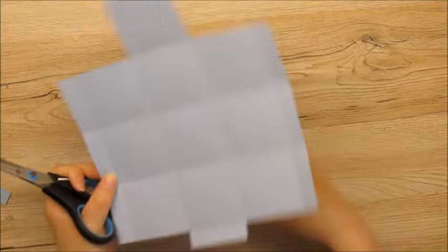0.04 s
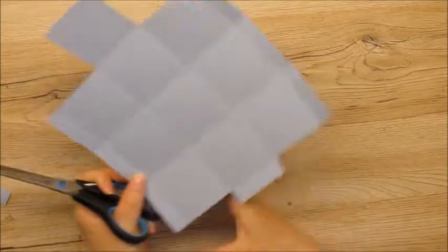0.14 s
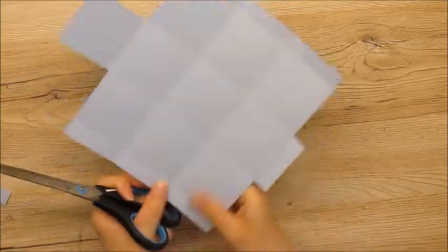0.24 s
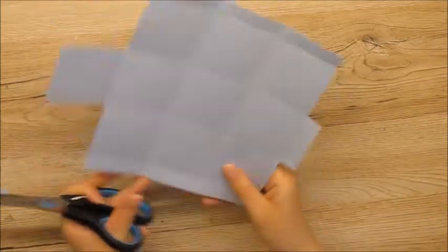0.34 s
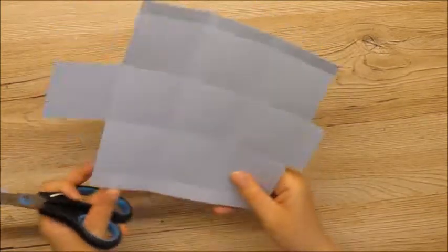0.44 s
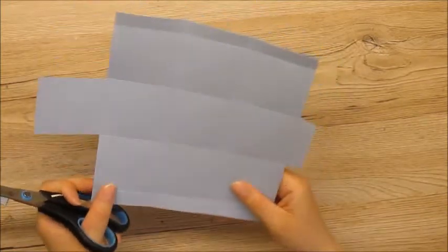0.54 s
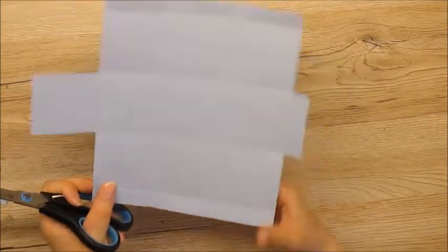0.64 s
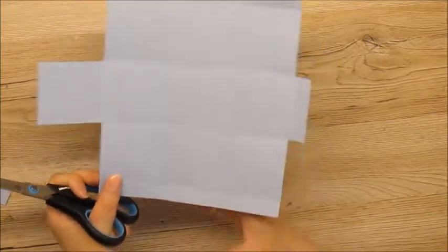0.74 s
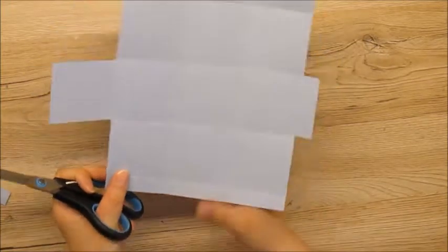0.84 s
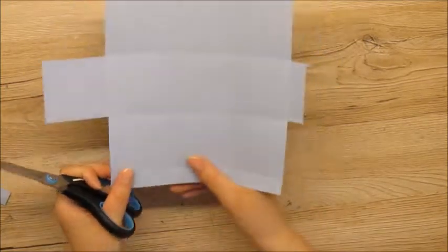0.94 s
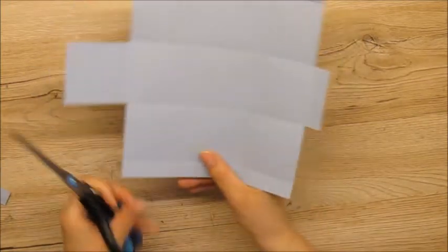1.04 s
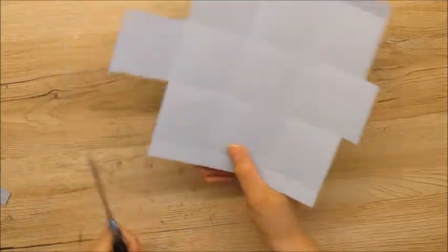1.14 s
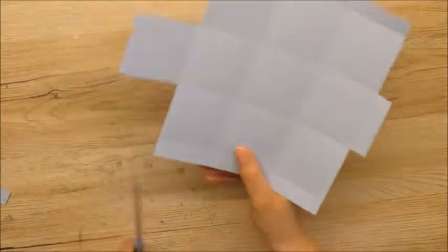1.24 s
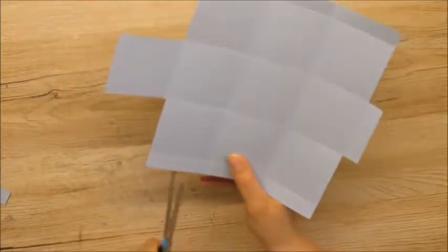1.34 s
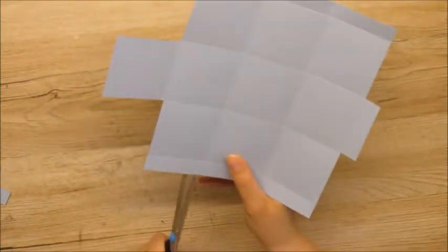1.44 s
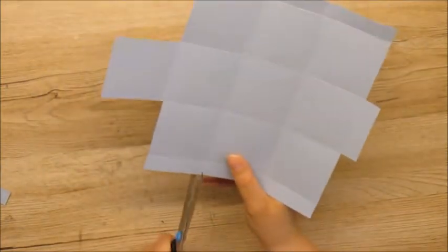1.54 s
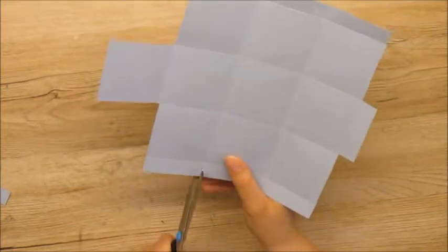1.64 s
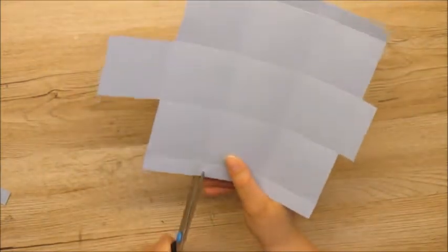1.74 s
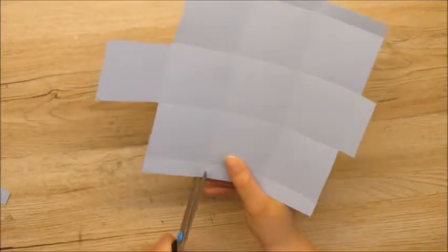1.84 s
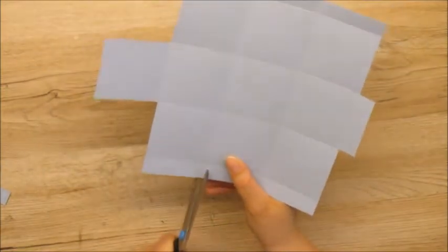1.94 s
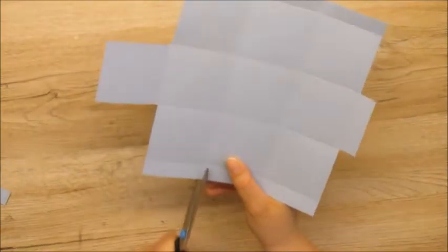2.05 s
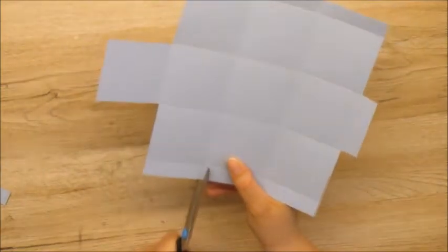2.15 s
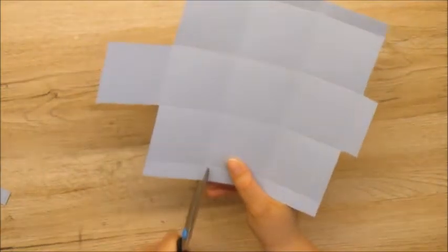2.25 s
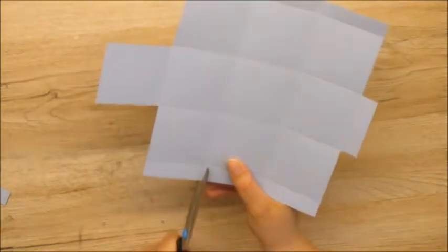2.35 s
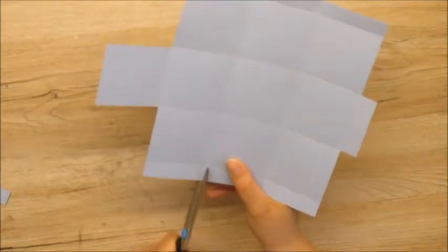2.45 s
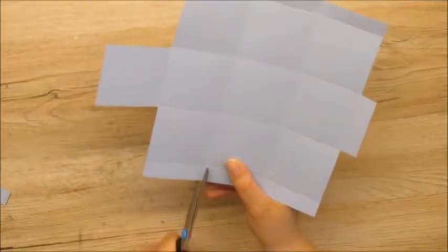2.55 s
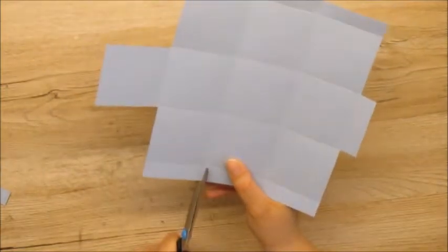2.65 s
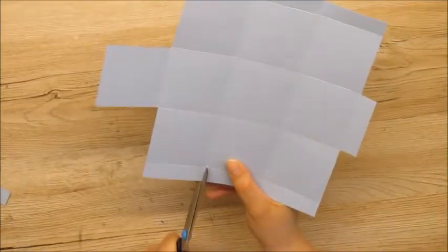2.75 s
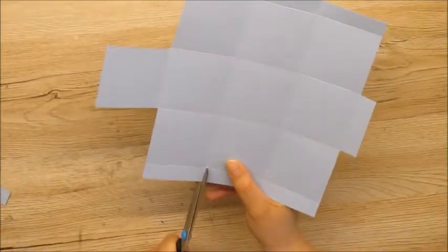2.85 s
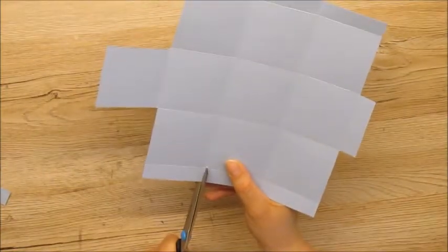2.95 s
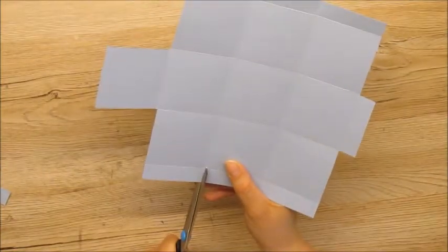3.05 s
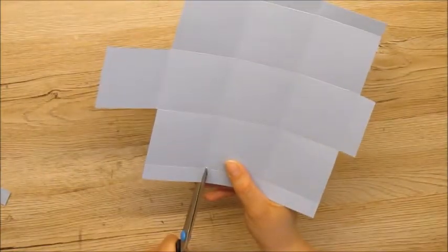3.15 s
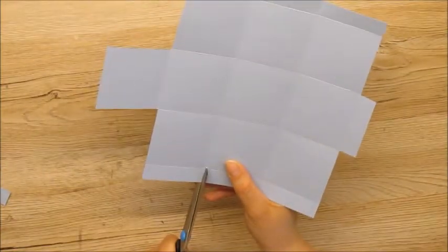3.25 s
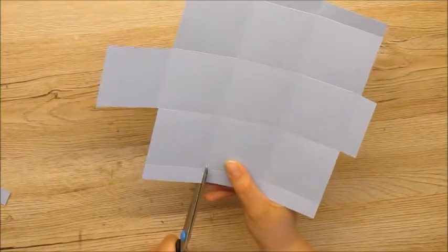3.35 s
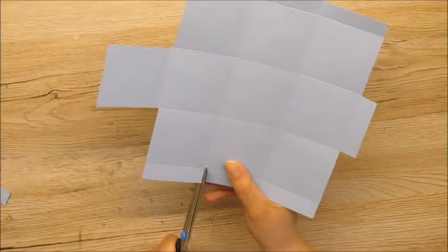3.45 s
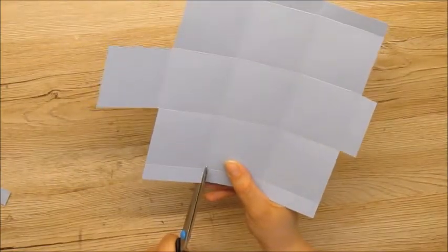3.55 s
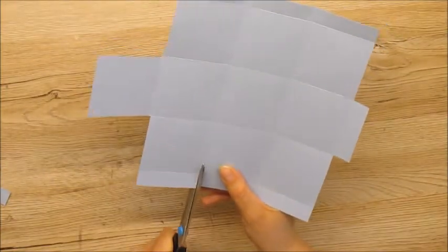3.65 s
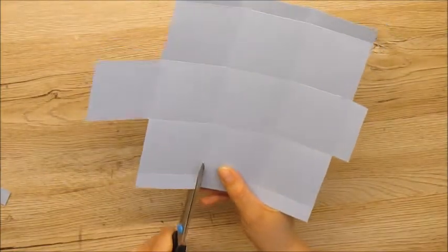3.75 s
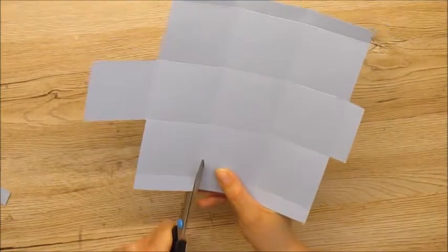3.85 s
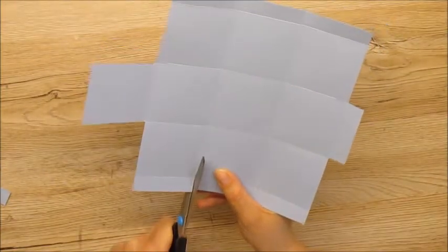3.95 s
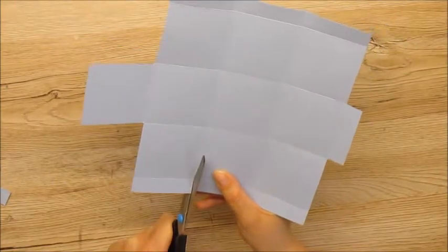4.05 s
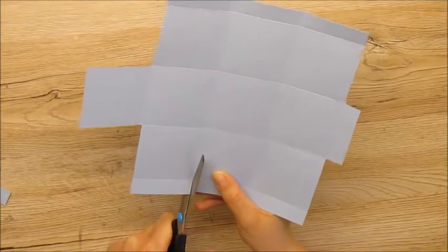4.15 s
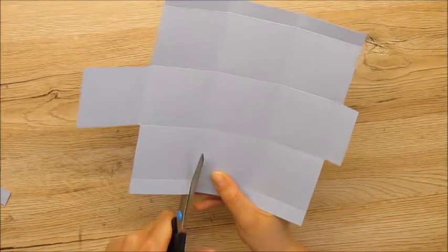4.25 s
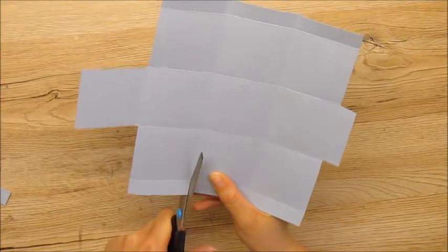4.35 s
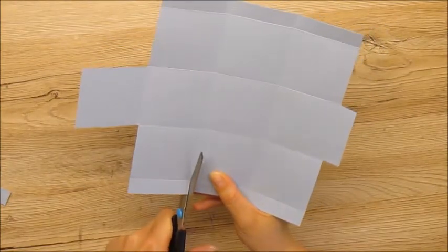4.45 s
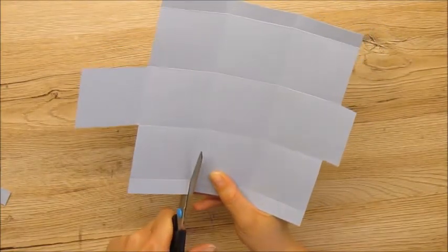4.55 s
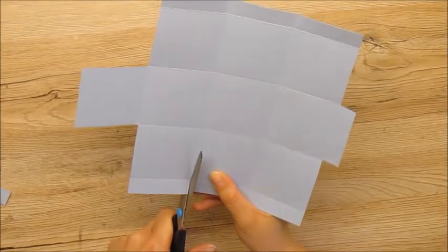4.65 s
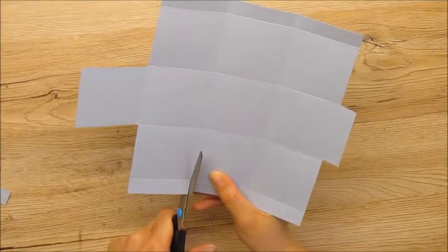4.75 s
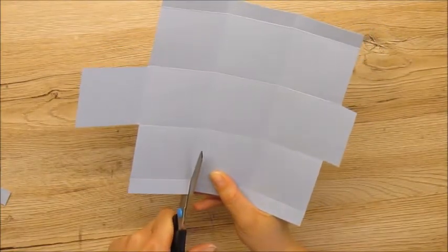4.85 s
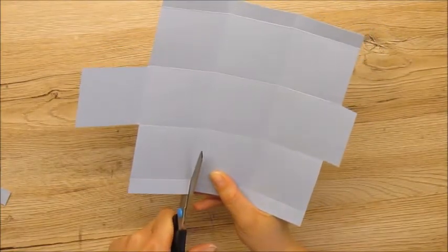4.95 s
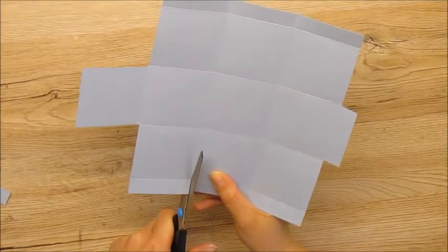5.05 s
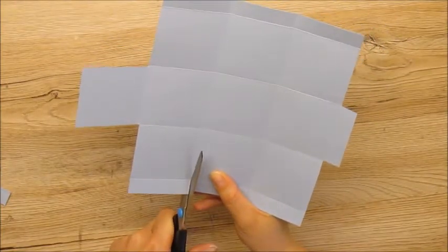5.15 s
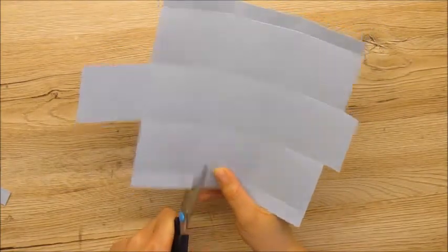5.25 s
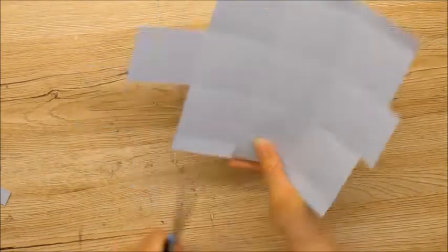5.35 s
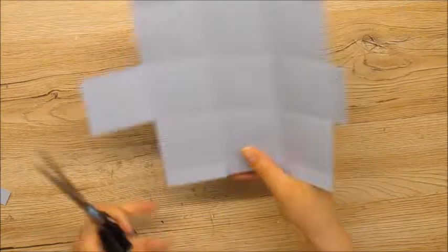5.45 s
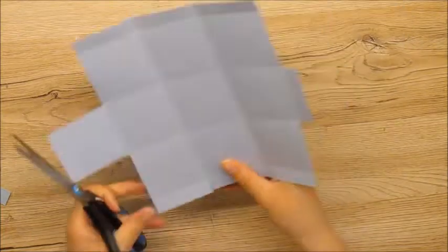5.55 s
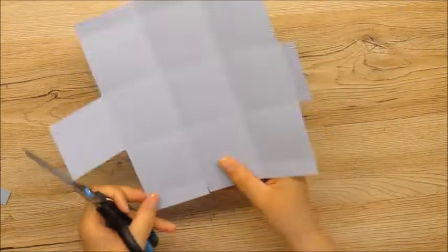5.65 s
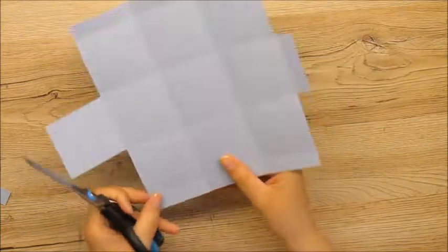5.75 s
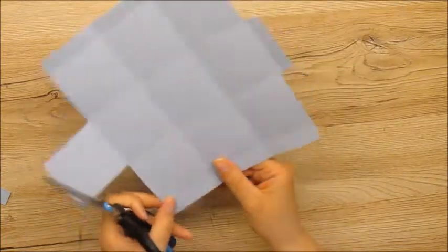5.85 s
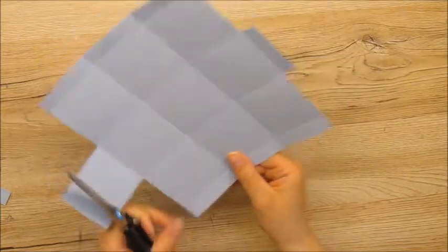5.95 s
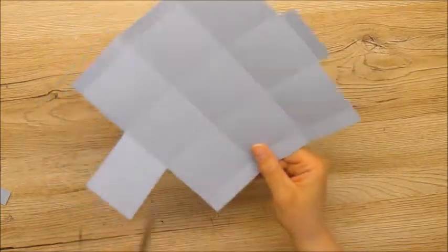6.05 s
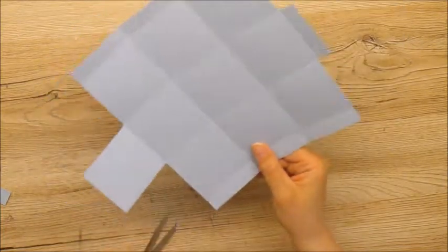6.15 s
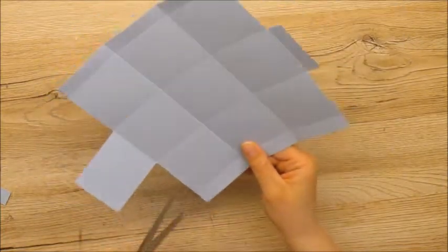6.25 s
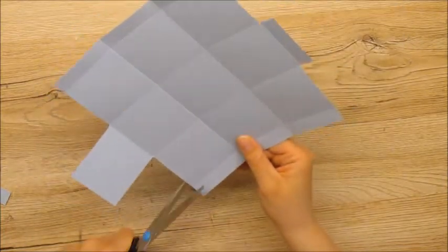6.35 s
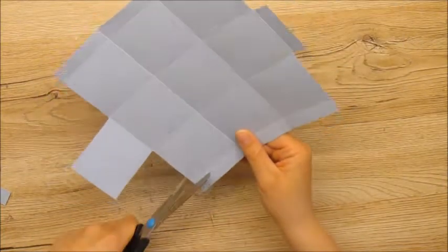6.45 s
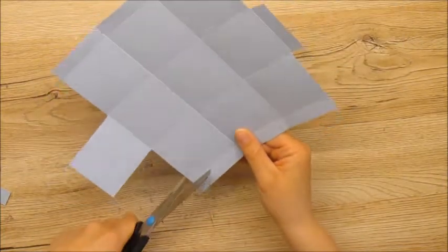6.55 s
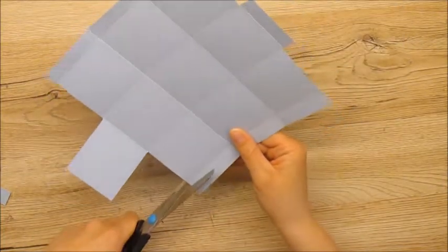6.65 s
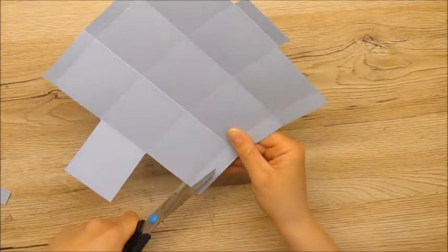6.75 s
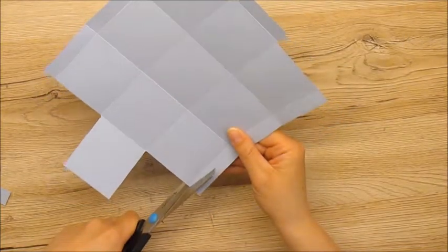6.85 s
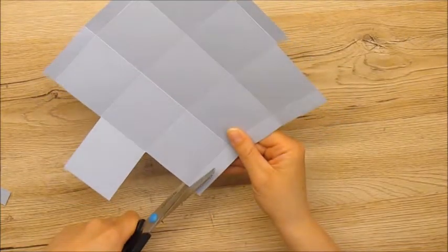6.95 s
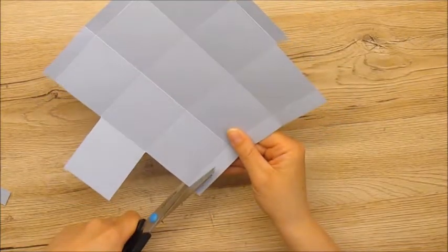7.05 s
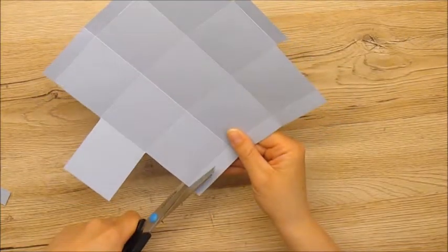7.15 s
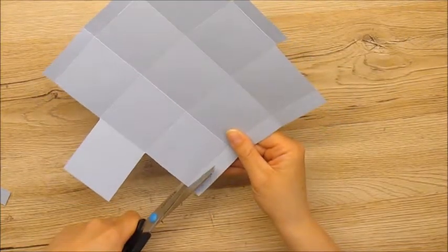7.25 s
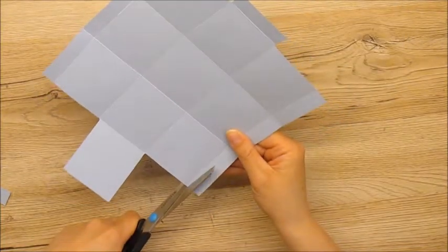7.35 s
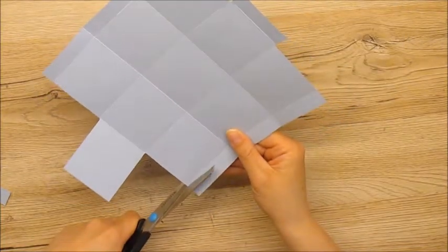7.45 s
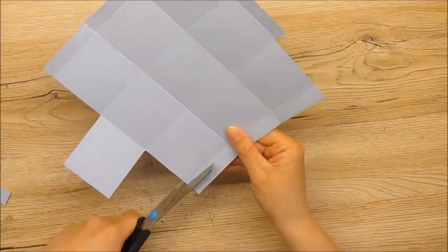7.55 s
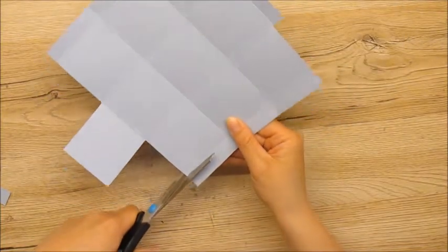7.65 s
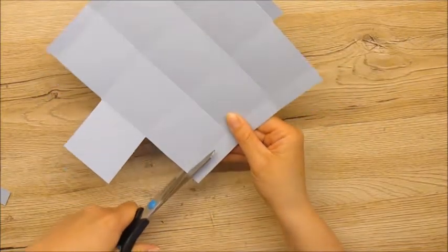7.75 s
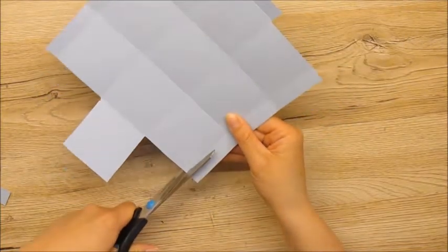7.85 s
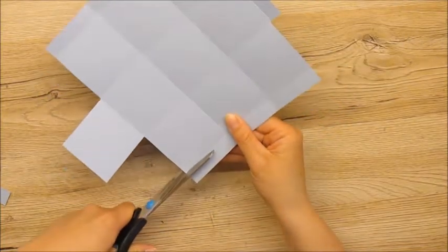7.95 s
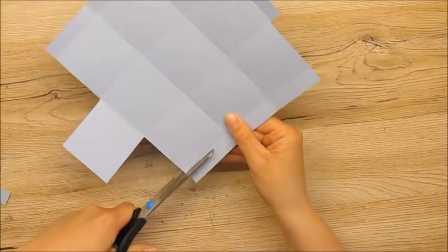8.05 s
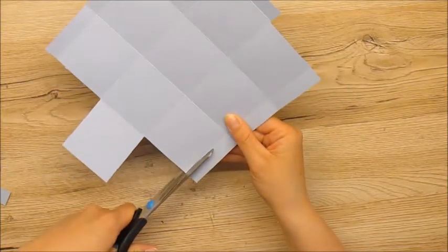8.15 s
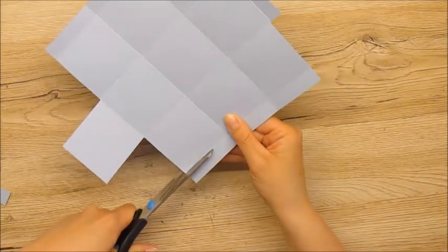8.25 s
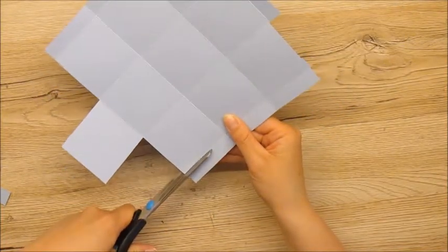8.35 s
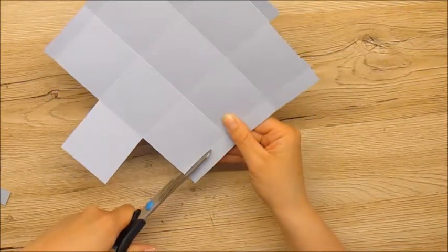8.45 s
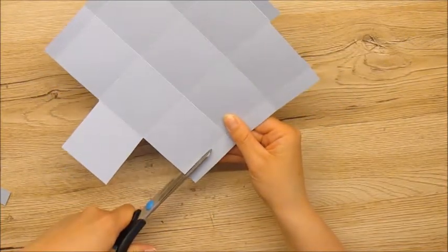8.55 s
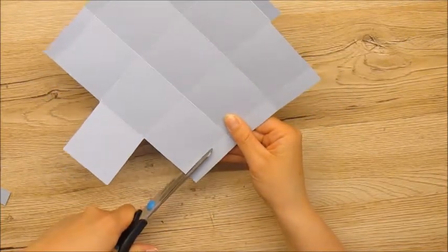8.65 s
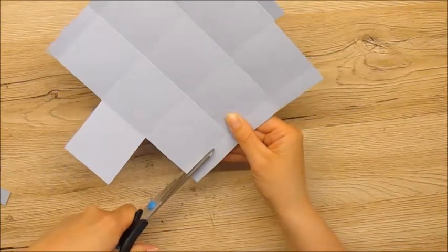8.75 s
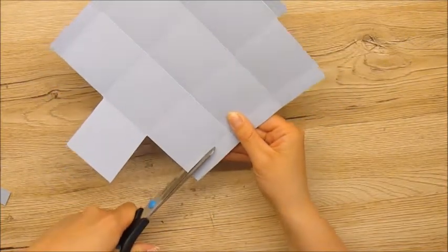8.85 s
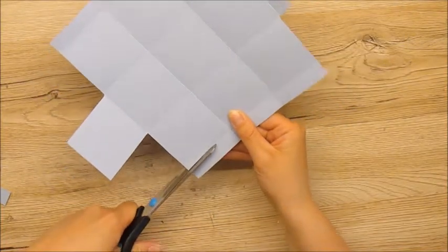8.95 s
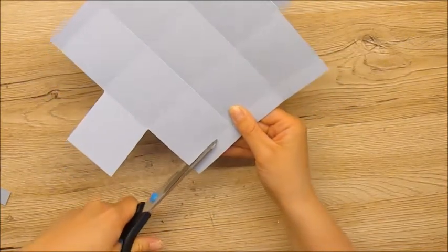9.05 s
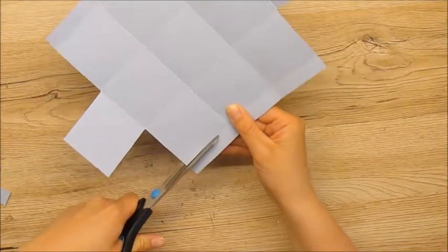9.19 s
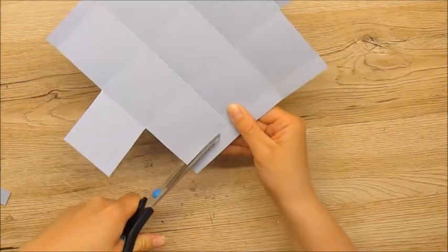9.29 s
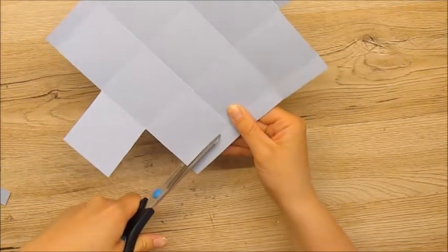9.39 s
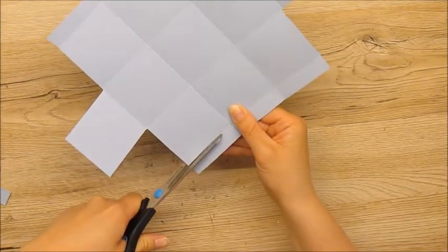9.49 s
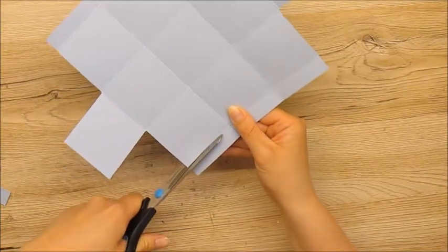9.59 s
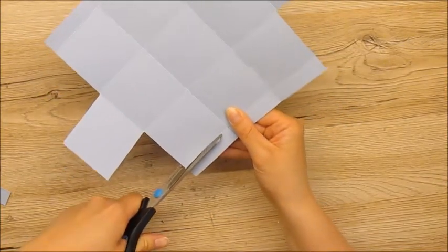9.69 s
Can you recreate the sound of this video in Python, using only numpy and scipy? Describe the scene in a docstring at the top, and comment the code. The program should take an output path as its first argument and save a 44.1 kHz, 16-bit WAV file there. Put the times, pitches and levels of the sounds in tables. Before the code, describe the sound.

Close stereo capture of card and scissors on a wooden tabletop. Busy papery slides and bumps come first, ending in a sharp scrape. A pause holds a tiny metallic squeak, then a firm knock and a single slow shearing crunch. After another pause, blades rasp loose, a loud wooden knock lands and the card shuffles. Small dry ticks, a barely audible squeak and brief rubs finish over faint low room rumble.

```python
"""A stiff card slides over a wooden table in a small room, with knocks and one harsh scrape on the table.
A faint squeak follows, scissors knock on the wood, then shear one slow cut through the card.
The blades rasp as they leave the slit, with heavy knocks; the card slides, flicks and ticks on them.
After another faint squeak come the last slides. Rubbing and contacts are noise bursts ringing in card
and steel; the wood is a set of fading tones; echoes surround the sounds over a steady room noise."""
import sys
import numpy as np
from scipy import signal
from scipy.fft import rfft, irfft, next_fast_len
from scipy.io import wavfile
from scipy.ndimage import uniform_filter1d

SR = 44100
rng = np.random.default_rng(int(sys.argv[2]) if len(sys.argv) > 2 else 0)


def digitize_waveform(pressure):
    """Quantize a signal to 16-bit integers and store it at the path in sys.argv[1].

    Rows of a 2-D input are taken as channels; values are limited to [-1, 1].
    """
    field = np.atleast_2d(pressure).T
    bounded = np.clip(field, -1, 1)
    quanta = np.round(bounded * 32767).astype(np.int16)
    wavfile.write(sys.argv[1], SR, quanta)


N = 428652

# relative colour of the flat card, driven like a drum skin: pitch_hz [Hz], level_db [dB per Hz]
SHEET_COLOUR = [(60, -10), (200, -2.5), (400, -8), (650, -9.5), (900, -0.5), (1600, -1), (3000, -3),
                (4500, -13), (8000, -37), (16000, -81.5)]
# relative colour of the hiss at the card's edge: pitch_hz [Hz], level_db [dB per Hz]
EDGE_COLOUR = [(500, -50.5), (2000, -16), (3500, 0), (5000, 1), (7000, 1.5), (10000, 2), (12500, -3.5),
               (15500, -13)]


def amp(db):
    """Turn decibels into a gain."""
    return 10 ** (np.asarray(db) / 20)


def unit(x):
    """Scale x to an rms (average strength) of 1."""
    return x / np.sqrt(np.mean(x ** 2) + 1e-20)


def along(points, hz):
    """Read a curve of (Hz, value) points on a logarithmic pitch axis."""
    point_hz, value = np.transpose(points)
    return np.interp(np.log(hz + 1), np.log(point_hz + 1), value)


def filtered(x, response):
    """Multiply each pitch in x by a response that depends on frequency."""
    size = x.shape[-1]
    padded = next_fast_len(size + SR // 4)
    hz = np.fft.rfftfreq(padded, 1 / SR)
    return irfft(rfft(x, padded) * response(hz), padded)[..., :size]


def convolved(x, ring):
    """Let every sample of x ring on in the shape of an impulse response."""
    return signal.fftconvolve(x, ring, axes=-1)


def add(track, start_s, sound):
    """Mix a sound into the stereo track from its start time."""
    part = track[:, max(round(start_s * SR), 0):][:, :sound.shape[1]]
    part += sound[:, :part.shape[1]]


def wobble(rate, size):
    """Draw a random curve through `rate` random points a second."""
    points = rng.standard_normal(SR // 10)
    return np.interp(np.arange(size) * rate / SR, np.arange(SR // 10), points)


def strokes(rows):
    """Give the start time of a stroke, then each of its columns sample by sample."""
    time_s, *columns = np.transpose(rows)
    t = np.arange(time_s[0], time_s[-1], 1 / SR)
    return time_s[0], *(np.interp(t, time_s, column) for column in columns)


def body(colour, peaks=(), size=4096):
    """Ring of a solid object: a broad colour plus resonances, with a total energy of 1."""
    hz = np.fft.rfftfreq(size, 1 / SR)
    db = along(colour, hz)
    for centre_hz, width_hz, gain_db in peaks:
        db = db + gain_db / (1 + (2 * (hz - centre_hz) / width_hz) ** 2)
    # keeping one half of the cepstrum makes the ring start at once and only follow the blow
    cepstrum = irfft(np.log(amp(db)))
    ring = irfft(np.exp(rfft(2 * cepstrum[:size // 2], size)))
    return ring / np.linalg.norm(ring)


def room_tone(level_db=-58.5):
    """Low rumble of the room under a hiss; the two ears hear partly the same noise at each pitch."""
    # relative colour of the noise: pitch_hz [Hz], level_db [dB per Hz]
    floor_colour = [(12, -28.5), (20, -5.5), (65, 3.5), (167, -3.5), (215, -1.5), (247, -6), (408, -10),
                    (510, -14.5), (819, -18), (1050, -17.5), (1740, -22.5), (2120, -24), (2300, -25.5),
                    (9560, -28), (15800, -32.5)]
    # how alike left and right are: pitch_hz [Hz], likeness [-1 opposite to 1 identical]
    floor_alike = [(60, -0.579), (150, -0.4654), (380, -0.35), (950, -0.085), (2380, 0.205), (5980, -0.088),
                   (15000, 0.122)]

    def response(hz):
        turn = np.arccos(np.clip(along(floor_alike, hz), -1, 1)) / 2
        return amp(along(floor_colour, hz)) * [np.cos(turn), np.sin(turn)]

    mid, side = filtered(rng.standard_normal((2, N)), response)
    return amp(level_db) * np.array([mid + side, mid - side]) / np.std(mid)


def reflections(early_db, late_db, early_t60=0.0552):
    """Dense echoes from the table and things near it, then the room's tail; t60 is a 60 dB fade in s."""
    # how long the room rings: pitch_hz [Hz], t60_s [s]
    room_fade = [(200, 0.3), (2000, 0.2317), (12000, 0.211)]
    hz, t, z = signal.stft(rng.standard_normal(SR // 2), SR, nperseg=256)
    fade = amp(-60 * t / along(room_fade, hz)[:, None])
    late = signal.istft(z * fade, SR, nperseg=256)[1]
    t = np.arange(len(late)) / SR
    early = rng.standard_normal(len(late)) * amp(-60 * t / early_t60)
    return amp(early_db) * early / np.linalg.norm(early) + amp(late_db) * late / np.linalg.norm(late)


def in_room(x, early_db, late_db, side_db):
    """Put the direct sound in the middle, with reflections spreading wider towards the treble."""
    # width of the reflections, before side_db is added: pitch_hz [Hz], side_level_db [dB]
    side_width = [(100, -5.5), (500, -16.5), (1000, -10.5), (2000, -4), (5000, -1.5), (14000, 0.5)]
    middle = reflections(early_db, late_db)
    middle[0] += 1  # the direct sound
    spread = filtered(reflections(early_db, late_db), lambda hz: amp(side_db + along(side_width, hz)))
    mid, side = np.array([convolved(x, middle), convolved(x, spread)]) / np.linalg.norm(middle)
    return np.array([mid + side, mid - side])


def table_ring(low_hz, high_hz, attack=0.0006):
    """The table's modes (own tones) after a blow: a soft one misses high modes, a light one low modes."""
    # modes of the table top; broad, short ones are the crack of the blow:
    # pitch_hz [Hz], level_db [dB, before about 1 dB of chance and the blow's reach], t60_s [s]
    table_modes = [(118, -28, 0.082), (146, -24.5, 0.0795), (211.34, -20, .23), (270.6, -27.5, 0.1084),
                   (324.7, -16, 0.0166), (390.1, -21, 0.094), (448, -29, 0.19), (552, -29, 0.137),
                   (683.2, -25.5, 0.1103), (713, -19, 0.026), (916.2, -18.5, 0.0913),
                   (1013.7, -28.5, 0.1085), (1089, -16, 0.019), (1168.6, -14, 0.0395), (1327, -18.5, 0.08),
                   (1388.6, -19, 0.0261), (1570, -40, 0.24), (1680.6, -25, .045), (2174, -30.5, 0.0511),
                   (2439, -45, 0.199), (2934, -29, 0.037)]
    t = np.arange(SR // 2) / SR
    modes = 0
    for k, (hz, db, t60) in enumerate(table_modes):
        reach = 1 / np.hypot(1, (hz / high_hz) ** 2) / np.hypot(1, (low_hz / hz) ** 4)
        fade = amp(db + rng.normal(0, 1) - 60 * t / t60)
        modes = modes + (-1) ** k * reach * fade * np.sin(2 * np.pi * hz * t)
    return modes * (1 - np.exp(-t / attack))


def table_boom(attack=0.026):
    """The whole table flexing: its lowest mode, which builds up slowly."""
    boom_hz, boom_t60_s = 73.58, 0.41
    t = np.arange(SR // 2) / SR
    fade = amp(-60 * t / boom_t60_s)
    return 2 * np.sin(2 * np.pi * boom_hz * t) * fade * (1 - np.exp(-t / attack))


def jolt(rise, sheet_db):
    """The table's answer to a contact: a longer push moves it more than a dry tick."""
    half_power_rise_s = 0.0044  # this rise gives half the full jolt's power
    push = rise / np.hypot(rise, half_power_rise_s)
    full_jolt_db = sheet_db + 23
    return push * amp(full_jolt_db) * table_ring(low_hz=364, high_hz=450)[None]


def knocks():
    """Hands, card and scissors bump the table, which rings and booms."""
    # blows: start_s [s], mode_gain_db [dB], highest_pitch_hz [Hz, where its reach fades], boom_gain_db [dB]
    blows = [(.055, -23, 250, -51.5), (.241, -23.5, 346, -63), (.335, -25.5, 300, -69),
             (.555, -23, 220, -59), (.675, -24, 300, -72.5), (0.891, -15, 260, -56.5),
             (3.026, -28, 300, -52.5), (3.316, -40.5, 300, -33), (5.323, -10.5, 110, -41),
             (5.586, 2.5, 5000, -47), (5.686, -21, 300, -66.5)]
    track = np.zeros((2, N))
    for start_s, gain_db, high_hz, boom_db in blows:
        wood = amp(gain_db) * table_ring(low_hz=79.9, high_hz=high_hz)
        boom = amp(boom_db) * table_boom(attack=0.019)
        add(track, start_s, in_room(wood + boom, early_db=-16.5, late_db=-11.0, side_db=4.5))
    return track


def squeaks(waver=0.038):
    """The scissors' pivot squeaks: steel sticks and slips on steel in a faint, unsteady whistle."""
    # squeaks: start_s [s], length_s [s], pitch_hz [Hz at the start, before waver],
    # glide [octaves per second], level_db [dB, before the fade in and out]
    squeak_rows = [(2.092, 0.044, 1985, 5.36, -57.5), (8.787, 0.088, 3015, 0.18, -68.5)]
    track = np.zeros((2, N))
    for start_s, length_s, hz, glide, db in squeak_rows:
        t = np.arange(round(length_s * SR)) / SR
        pitch = hz * 2 ** (glide * t) * (1 + waver * wobble(rate=368, size=len(t)))
        tone = np.sqrt(2) * np.sin(2 * np.pi * np.cumsum(pitch) / SR)
        whistle = amp(db) * np.hanning(len(t)) * tone
        add(track, start_s, in_room(whistle, early_db=0.5, late_db=-2.5, side_db=2))
    return track


def friction(size, slip_rate, grain_share, clump_rate, clump_db):
    """Force of rubbing fibres, rms 1: tiny slips on a smooth hiss, bunched into clumps."""
    slips = (rng.random(SR) < slip_rate / SR) * rng.standard_normal(SR)  # slip_rate is slips per second
    smooth = rng.standard_normal(SR)
    force = np.sqrt(grain_share) * unit(slips) + np.sqrt(1 - grain_share) * smooth
    return unit(np.resize(force, size) * amp(clump_db * wobble(clump_rate, size)))


def flexing(x, depth_db, band_size=5, frame_size=24):
    """As the card bends its resonances wander: a random gain, smooth in frequency and time."""
    z = signal.stft(x, nperseg=512)[2]
    field = uniform_filter1d(rng.standard_normal(z.shape), band_size, 0)
    field = uniform_filter1d(field, frame_size, 1)
    bent = signal.istft(z * amp(depth_db * unit(field)), nperseg=512)[1]
    return bent * np.linalg.norm(x) / np.linalg.norm(bent)  # the same energy as before


def swell(attack, length):
    """Gain of one stroke: it gathers speed, is fastest midway and runs out."""
    release_t60_s, arch_depth_db = .22, 2
    t = np.arange(0, length + release_t60_s, 1 / SR)
    arch_db = arch_depth_db * (np.sin(np.pi * np.minimum(t / length, 1)) - 1)
    release_db = -60 * np.maximum(t - length, 0) / release_t60_s
    return (1 - np.exp(-t / attack)) * amp(arch_db + release_db)


def slides(sheet_trim_db=1, edge_trim_db=.5):
    """The card's edge rubs on wood or steel: it hisses and drives the sheet like a drum skin."""
    # strokes: start_s [s], attack_s [s], length_s [s, before the release],
    # sheet_level_db [dB, before trim and swell], edge_level_db [dB, before trim and swell]
    slide_rows = [ (0.0, .003, 0.0706, -56, -63), (.085, .008, 0.117, -62.5, -58),
                  (.222, .012, 0.1192, -44.5, -46.5), (.525, .015, 0.278, -58, -56),
                  (.59, .04, 0.0942, -50, -45.5), (.72, .02, 0.102, -57.5, -50),
                  (.85, .02, 0.0786, -53, -50), (1.02, .02, 0.18, -61, -59.5),
                  (5.38, .015, 0.345, -61, -57.5), (5.62, .03, 0.093, -51, -48.5),
                  (5.735, .015, 0.0656, -56, -48), (5.82, .015, .11, -61, -56.5),
                  (6.55, 0.061, .16, -54, -64), (9.065, .022, 0.1103, -51, -55.5),
                  (9.543, 0.0136, .042, -50.5, -53.5), (9.581, .015, 0.068, -63.5, -78.5)]
    # resonances of the sheet: pitch_hz [Hz], width_hz [Hz], gain_db [dB]
    sheet_peaks = [(960, 230, 6.5), (1331, 160, -8), (1540, 200, 4), (2300, 210, 4.5), (3250, 350, -1)]
    track = np.zeros((2, N))
    for start_s, attack_s, length_s, sheet_db, edge_db in slide_rows:
        speed = swell(attack_s, length_s)
        rub = friction(size=len(speed), slip_rate=2300, grain_share=0.5, clump_rate=109.9, clump_db=3)
        force = speed * rub
        drum = convolved(force * amp(sheet_db + sheet_trim_db), body(SHEET_COLOUR, sheet_peaks))
        hiss = convolved(force * amp(edge_db + edge_trim_db), body(EDGE_COLOUR))
        card = flexing(drum + hiss, depth_db=2.0)
        add(track, start_s, in_room(card, early_db=-5.5, late_db=-13.0, side_db=3))
    return track


def contact(rise, sheet_db, edge_db, ring_hz, ring_db=10, ring_width=.3):
    """A short noise burst, from a dry tick to a scuff, ringing near one pitch."""
    # what a sudden contact adds to the hiss: pitch_hz [Hz], width_hz [Hz], gain_db [dB]
    crisp_peaks = [(3125, 400, 4), (6195, 167, 3), (14506, 4500, 2.5)]
    u = np.arange(SR // 10) / SR / rise  # time counted in rises
    burst = rng.standard_normal(len(u)) * u ** 2 * np.exp(-2 * u)
    ring_peaks = [(ring_hz, ring_width * ring_hz, ring_db), (1100, 250, 4)]
    drum = convolved(burst, body(SHEET_COLOUR, ring_peaks))
    hiss = convolved(burst, body(EDGE_COLOUR, crisp_peaks))
    sound = amp(sheet_db) * drum / np.linalg.norm(drum) + amp(edge_db) * hiss / np.linalg.norm(hiss)
    return sound * np.sqrt(SR * .01)  # levels count over 10 ms


def flicks_and_bumps():
    """Card flicks and scuffs, and scissors or a hand knocking down: short bursts that jolt the table."""
    # contacts: start_s [s], rise_s [s], sheet_level_db [dB over 10 ms],
    # edge_level_db [dB over 10 ms], ring_pitch_hz [Hz]
    contact_rows = [(.235, 0.00204, -46, -61.5, 890), (.667, 0.00294, -41, -42.5, 1600),
                    (.892, 0.00047, -38.5, -42.5, 2240), (1.155, 0.00194, -55, -46, 2950),
                    (3.024, 0.000653, -43, -56, 1980), (3.276, 0.00198, -48, -51, 1260),
                    (3.312, 0.00489, -30, -31, 2590), (5.586, 0.001153, -25, -40, 981),
                    (5.615, 0.00152, -37, -45.5, 1000), (5.686, 0.0075, -44, -40.5, 2170),
                    (5.93, 0.00645, -45, -42.5, 2285), (6.079, 0.00417, -56, -47.5, 2610),
                    (6.899, 0.000567, -44, -57.5, 1906), (8.284, 0.00276, -45, -47, 1540),
                    (8.504, 0.00247, -43, -46.5, 3243)]
    track = np.zeros((2, N))
    for start_s, rise_s, sheet_db, edge_db, ring_hz in contact_rows:
        burst = contact(rise_s, sheet_db, edge_db, ring_hz)
        add(track, start_s, in_room(burst, early_db=-2.5, late_db=-6.5, side_db=1.5))
        add(track, start_s + rise_s, jolt(rise_s, sheet_db))
    return track


def ticks():
    """The held card taps the open blades as they line up; the grip stays, so every tick rings alike."""
    # taps: start_s [s], sheet_level_db [dB over 10 ms]
    tick_rows = [(7.651, -49), (7.852, -59.5), (7.881, -53.5), (7.994, -54), (8.012, -50), (8.035, -49.5),
                 (8.048, -54), (8.084, -54), (8.299, -55), (8.332, -53.5), (8.418, -51.5), (8.461, -46.5),
                 (8.476, -56)]
    rise_s, ring_hz = 0.0031, 1004.6
    track = np.zeros((2, N))
    for start_s, db in tick_rows:
        # the ring's width is a share of its pitch
        tick = contact(rise_s, db, edge_db=db - 3.5, ring_hz=ring_hz, ring_db=14, ring_width=.17)
        add(track, start_s, in_room(tick, early_db=-2.5, late_db=-4, side_db=1.0))
        add(track, start_s + rise_s, jolt(rise_s, db))
    return track


def scrapes(sheet_trim_db=-1.39, edge_trim_db=-0.38, ring_db=9, ring_octaves=0.1597):
    """The card scrapes over the table; later the blades pull out along its edge; its ring shifts in pitch."""
    # one curve a stroke: time_s [s], sheet_level_db [dB, before trim and ring],
    # edge_level_db [dB, before trim and ring], ring_pitch_hz [Hz, of the card]
    scrape_curves = [
        [(.977, -49.5, -55, 1080), (.985, -42, -45, 1080), (1.003, -33.5, -29.5, 966), (1.013, -35, -25.5, 960),
         (1.023, -43.5, -50, 940), (1.06, -69.5, -55, 940)],
        [(5.208, -65.5, -69, 2200), (5.23, -53, -55.5, 2240), (5.267, -53, -47.5, 2500),
         (5.272, -43, -45, 2777), (5.291, -43.5, -30.5, 5230), (5.313, -38, -38, 2594),
         (5.361, -33.5, -35, 1940), (5.372, -53, -50.5, 1900), (5.395, -66, -62, 2000)],
    ]
    track = np.zeros((2, N))
    for rows in scrape_curves:
        start_s, sheet_db, edge_db, ring_hz = strokes(rows)
        force = friction(size=len(sheet_db), slip_rate=1000, grain_share=0.5, clump_rate=150, clump_db=1.0)
        drum = convolved(force * amp(sheet_db + sheet_trim_db), body(SHEET_COLOUR))
        hiss = convolved(force * amp(edge_db + edge_trim_db), body(EDGE_COLOUR))
        rasp = flexing(drum + hiss, depth_db=3.0, frame_size=8)
        # lift the pitches near the moving ring
        hz, t, z = signal.stft(rasp, SR, nperseg=256)
        ring_now = np.interp(t * SR, np.arange(len(ring_hz)), ring_hz)
        away = np.log2((hz[:, None] + 1) / ring_now) / ring_octaves
        rasp = signal.istft(z * amp(ring_db * np.exp(-away ** 2)), SR, nperseg=256)[1]
        add(track, start_s, in_room(rasp, early_db=-4, late_db=-11, side_db=1.5))
    return track


def fibre_level(force_db):
    """The hiss of the fibres grows faster than the force: a firm stroke is brighter."""
    growth, firm_db = 1.359, -47  # dB of hiss per dB of force; the force of a firm stroke
    return firm_db + growth * (force_db - firm_db)


def cut(blade_trim_db=2.0, fibre_trim_db=4.5, hum_db=1, boom_db=1.0):
    """Fibres part densely between the blades; the lower blade rests on the table and makes it hum."""
    # the one slow cut: time_s [s], blade_force_db [dB, before trim]
    cut_curve = [(3.56, -78.5), (3.598, -48.5), (3.655, -49), (3.735, -62), (3.78, -54.5), (3.85, -54.5),
                 (4.07, -61.5), (4.15, -59), (4.225, -70), (4.33, -59), (4.42, -80)]
    # relative colour of the shearing: pitch_hz [Hz], level_db [dB per Hz]
    shear_colour = [(60, 5), (200, -8.5), (400, -1.5), (600, -3.5), (1000, 3), (2000, -1), (3000, 0),
                    (4500, -12), (8000, -43), (16000, -73)]
    # resonances of the blades: pitch_hz [Hz], width_hz [Hz], gain_db [dB]
    blade_peaks = [(900, 110, 5), (1480, 210, 12.3), (4720, 260, 5), (9040, 650, 2.5)]
    track = np.zeros((2, N))
    start_s, blade_db = strokes(cut_curve)
    force = friction(size=len(blade_db), slip_rate=2900, grain_share=0.67, clump_rate=270, clump_db=0.5)
    shear = convolved(force * amp(blade_db + blade_trim_db), body(shear_colour, blade_peaks))
    hiss_db = fibre_level(blade_db) + fibre_trim_db
    hiss = convolved(force * amp(hiss_db), body(EDGE_COLOUR, blade_peaks))
    add(track, start_s, in_room(shear + hiss, early_db=-4, late_db=-11.5, side_db=1.5))

    wood, boom = table_ring(low_hz=149, high_hz=219), table_boom()
    table = amp(hum_db) * wood / np.linalg.norm(wood) + amp(boom_db) * boom / np.linalg.norm(boom)
    pressure = amp(np.minimum(blade_db, -53))  # a faster cut presses no harder on the table
    add(track, start_s, convolved(force * pressure, table)[None])
    return track


def scene():
    """Card, scissors and table, leaning left or right by pitch, over the room's noise."""
    # left-right balance: pitch_hz [Hz], left_over_right_db [dB]
    balance = [(400, 1.24), (1200, -0.28), (2500, -1), (8000, -0.53), (13000, -0.03)]
    work = knocks() + squeaks() + slides() + flicks_and_bumps() + ticks() + scrapes() + cut()
    leaning = filtered(work, lambda hz: amp(np.outer([.5, -.5], along(balance, hz))))
    return leaning + room_tone()


def record(dry):
    """Cut a narrow notch in the treble and everything from a steep upper limit."""
    notch_hz, half_width_hz, top_hz = 7870, 45, 15850

    def response(hz):
        away = 1j * (hz - notch_hz)
        return away / (half_width_hz + away) * (hz < top_hz)

    return filtered(dry, response)


dry = scene()
out = record(dry)
digitize_waveform(out)
```